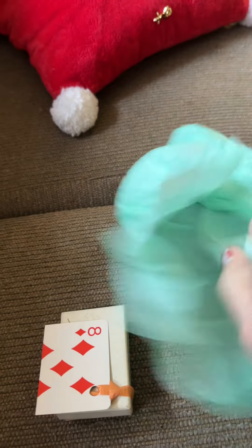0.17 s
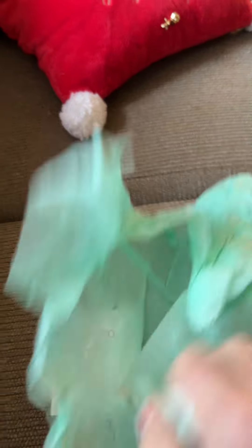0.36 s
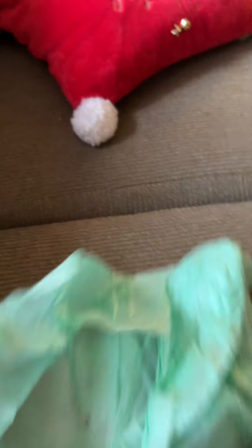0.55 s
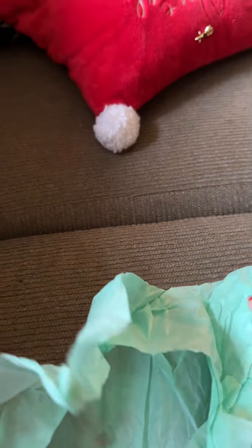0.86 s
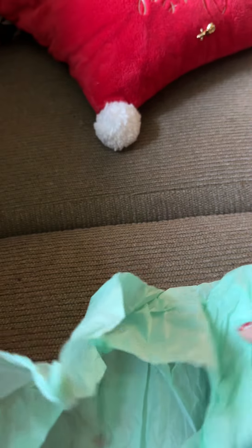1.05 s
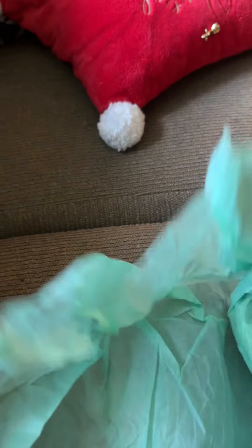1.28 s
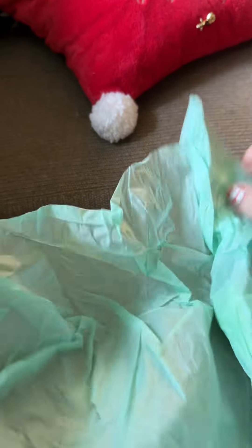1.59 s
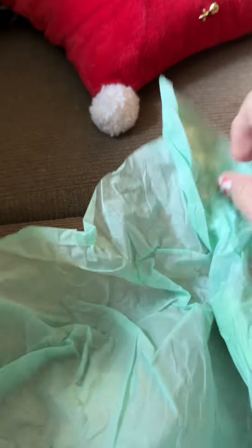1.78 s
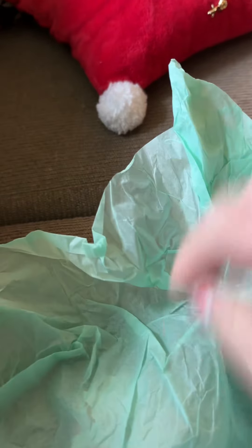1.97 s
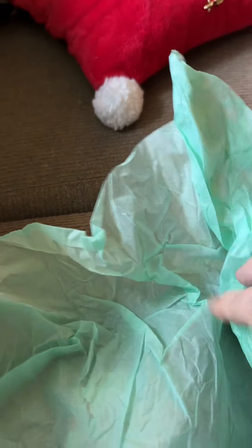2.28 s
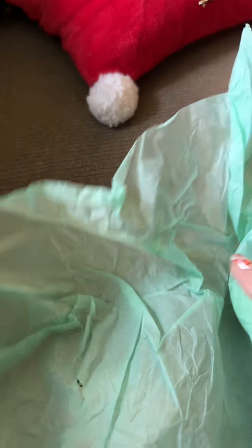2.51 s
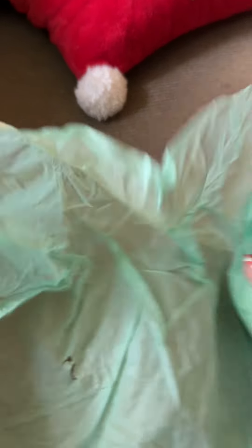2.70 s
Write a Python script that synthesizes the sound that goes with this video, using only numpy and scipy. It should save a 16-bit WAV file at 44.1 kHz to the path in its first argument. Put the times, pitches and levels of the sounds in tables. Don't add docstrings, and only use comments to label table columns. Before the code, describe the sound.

Tissue paper crinkles loudly at once as hands pull it about on a sofa, pauses with a few faint ticks, crackles again, pauses, then rustles to the end; close phone microphone, quiet room.

```python
import sys
import numpy as np
from scipy import signal
from scipy.fft import rfft, irfft, next_fast_len
from scipy.io import wavfile
from scipy.ndimage import uniform_filter1d, map_coordinates

SR = 44100
rng = np.random.default_rng(int(sys.argv[2]) if len(sys.argv) > 2 else 0)


def put_to_file(sound):
    columns = np.atleast_2d(sound).T
    safe = np.clip(columns, -1, 1)
    whole_steps = np.round(safe * 32767)
    wavfile.write(sys.argv[1], SR, whole_steps.astype(np.int16))


def gain_from_decibels(decibels):
    exponent = np.asarray(decibels, float) / 20
    return 10 ** exponent


N = 125685

FULL_DB = -38
# frequency in Hz, gain in dB.
PAPER_COLOUR = [(150, 0), (600, -0.5), (1500, 1.5), (4000, -3), (4850, -2), (5500, 1.5), (6900, -3.5),
                (9900, 0)]


def unit(x):
    return x / np.sqrt(np.mean(x ** 2) + 1e-20)


def along(points, hz):
    f, v = np.transpose(points)
    return np.interp(np.log(hz + 1), np.log(f + 1), v)


def wobble(knots_per_s):
    return unit(map_coordinates(rng.standard_normal(2000), [np.arange(N) * knots_per_s / SR]))


def filtered(x, response):
    m = next_fast_len(N + SR // 4)
    return irfft(rfft(x, m) * response(np.fft.rfftfreq(m, 1 / SR)), m)[..., :N]


def coloured_noise(points, above_hz=-1):
    return unit(filtered(rng.standard_normal((2, N)), lambda hz: gain_from_decibels(along(points, hz)) * (hz > above_hz)))


def creases(start_s, gain, hz, life_s, focus_db, low_share=0.014):
    size = 512
    t = np.arange(size) / SR
    f = np.fft.rfftfreq(size, 1 / SR) + 1
    octaves = np.log2(f / hz[:, None])
    colour = 1 + gain_from_decibels(focus_db) * np.exp(-(octaves / 0.42) ** 2)
    colour = colour / (1 + (low_share * hz[:, None] / f) ** 4)
    burst = irfft(rfft(rng.standard_normal((len(start_s), 2, size))) * colour[:, None], size)
    u = t / np.clip(life_s, 1e-4, .003)[:, None]
    burst = burst * (u ** 2 * np.exp(-u * 2.65))[:, None]
    burst = burst / np.abs(burst).max(axis=2, keepdims=True) * gain[:, None, None]
    at = (np.round(start_s * SR).astype(int)[:, None] + np.arange(size)).ravel()
    return np.array([np.bincount(at, burst[:, k].ravel(), N + SR)[:N] for k in range(2)])


def effort():
    # time in seconds, level in dB, dullness in dB.
    pulls = [(0, -41, 4), (.13, -30, -24.5), (.31, -40.5, -1.5), (.42, -35, -1.5), (0.592, -45, 0.5),
             (.68, -54.5, 3), (.76, -65.5, -6), (0.953, -89, -12), (.963, -40, -10), (1.14, -42.5, -5.5),
             (1.67, -41.5, 1.5), (1.834, -47, 0), (1.868, -62, 12.5), (2.076, -76, -13), (2.097, -51, 1),
             (2.221, -35.5, -12), (2.659, -39, -5.5), (2.721, -46, -11.5)]
    # peak time in seconds, rise in seconds, fall in seconds, boost in dB (negative: a dip).
    crushes = [(0.031, 0.016, 0.0067, -0.5), (0.166, 0.022, 0.022, 9.5), (.22, 0.021, 0.024, 7),
               (.26, 0.021, 0.023, 4), (.37, 0.012, 0.016, -0.5), (.405, 0.021, 0.027, 2),
               (.44, 0.034, 0.0099, 3), (.48, 0.018, 0.014, 6.5), (0.559, 0.012, 0.022, 5),
               (.647, 0.0077, 0.014, 7.5), (1.053, 0.02, 0.018, 7.5), (0.973, 0.0036, 0.0068, -3.5),
               (1.11, 0.0029, 0.0054, 2), (1.298, 0.02, 0.011, 8), (1.392, 0.05, 0.013, 7.5),
               (1.43, 0.0081, 0.009, 10.5), (1.525, 0.0048, 0.0084, 8.5), (1.59, 0.056, 0.025, 4),
               (1.645, 0.038, 0.015, 8), (1.677, 0.01, 0.0041, 5.5), (1.82, 0.007, 0.015, 2),
               (2.17, 0.0071, 0.008, 7), (2.186, .008, 0.0076, -7.5), (2.197, 0.0035, 0.0061, 4.5),
               (2.236, 0.011, 0.018, 4), (2.30, 0.022, 0.019, 6.5), (2.35, 0.046, 0.004, 2),
               (2.44, 0.013, 0.012, -3.5), (2.56, 0.0053, 0.028, 3), (2.60, 0.046, 0.04, 7),
               (2.74, 0.01, 0.056, 7.5), (2.81, 0.029, 0.029, 5)]
    t = np.arange(N) / SR
    swell_db = np.zeros(N)
    for at, rise_s, fall_s, boost_db in crushes:
        swell_db += boost_db * np.exp(-((t - at) / np.where(t < at, rise_s, fall_s)) ** 2)
    s, level_db, dull_db = np.transpose(pulls)
    return np.interp(t, s, level_db) + swell_db, np.interp(t, s, dull_db)


def crackles(level_db):
    per_s, centre_hz, spread_oct = 1400, 4450, 1.33
    life_s, size_db, still_db = 0.0011 / 2, 1.5, -53
    count = int(per_s * N / SR)
    draw = rng.standard_normal((count, 2))
    s = rng.uniform(0, N / SR, count)
    hand_db = level_db[(s * SR).astype(int)]
    share = np.minimum(1, gain_from_decibels(0.6 * (hand_db - FULL_DB)))
    buckles = (rng.uniform(0, 1, count) < share) & (hand_db > still_db)
    gain = gain_from_decibels(size_db * np.minimum(rng.exponential(1, count), 4)) * buckles / share ** 0.25
    hz = centre_hz * 2 ** (spread_oct * draw[:, 0])
    return unit(creases(s, gain, hz, life_s * gain_from_decibels(3 * draw[:, 1]), focus_db=9))


def rubbing():
    return rng.standard_normal((2, N)) * gain_from_decibels(1.2 * wobble(150))


def paper_bed(level_db, dull_db):
    # frequency in Hz, share of the dullness.
    dull_share = [(200, 1), (1200, 0.77), (4000, 0.5)]
    crackle_db = -5 + 1.5 * wobble(70)
    rub_db = -2.5 + 0.12 * np.minimum(level_db - FULL_DB, 0)
    bed = gain_from_decibels(crackle_db) * crackles(level_db) + gain_from_decibels(rub_db) * rubbing()
    bed = gain_from_decibels(level_db) * unit(filtered(bed, lambda hz: gain_from_decibels(along(PAPER_COLOUR, hz))))
    low = filtered(bed, lambda hz: along(dull_share, hz))
    return gain_from_decibels(3.5) * (bed + (gain_from_decibels(dull_db) - 1) * low)


def sofa(x):
    gain_db, t60_s = -19, .03
    t = np.arange(SR // 8) / SR
    tail = rng.standard_normal((2, len(t))) * gain_from_decibels(-60 * t / t60_s) * (t > .002)
    return gain_from_decibels(gain_db) * signal.fftconvolve(x, tail / np.linalg.norm(tail[0]), axes=1)[:, :N]


def air_puffs(level_db):
    # frequency in Hz, gain in dB.
    puff_colour = [(20, -42), (45, -11), (70, -1), (130, -6), (300, -8.5), (500, -11), (900, -40)]
    slow_db = uniform_filter1d(level_db, 1500)
    gain_db = -55 + 0.65 * (slow_db - FULL_DB) + 1.2 * wobble(11)
    return gain_from_decibels(gain_db) * coloured_noise(puff_colour)


def room_rumble():
    # frequency in Hz, gain in dB.
    rumble_colour = [(20, -57), (40, -10.5), (70, 1), (120, -12), (270, -15), (400, -47), (600, -87.5)]
    return gain_from_decibels(-59.5 + 1.5 * wobble(6.6)) * coloured_noise(rumble_colour)


def hiss():
    # frequency in Hz, gain in dB.
    hiss_colour = [(400, -17), (1000, -20), (1800, -4), (4100, -6), (4800, 6), (5400, -4), (10000, -6),
                   (12000, -12)]
    return gain_from_decibels(-68.5) * coloured_noise(hiss_colour, above_hz=300)


def loud_snaps():
    # start in seconds, peak in dB, colour in Hz.
    snap_rows = [(0.016, -27, 1900), (0.0253, -20.5, 1170), (0.0952, -24.5, 3100), (0.1638, -22.5, 3480),
                 (0.208, -22, 8100), (0.214, -28, 5800), (0.2212, -27.5, 4300), (0.247, -24.5, 6400),
                 (0.2669, -28, 2200), (0.2776, -26, 5600), (0.3363, -26, 1300), (0.3595, -23, 5700),
                 (0.3922, -20, 5700), (0.452, -25, 7400), (0.4725, -22, 5700), (0.4828, -18, 2400),
                 (0.5845, -24, 6500), (0.6447, -24.5, 7700), (0.6858, -36.5, 8400), (0.9637, -45, 1900),
                 (0.9698, -28, 8600), (1.0319, -22, 5800), (1.1061, -29, 6200), (1.1382, -27, 1530),
                 (1.177, -34, 6200), (1.1835, -24.5, 3000), (1.192, -27.5, 7540), (1.2066, -24, 6140),
                 (1.2194, -22, 7600), (1.2326, -25, 5540), (1.2468, -21.5, 9500), (1.2573, -24, 8900),
                 (1.2686, -23, 6100), (1.3007, -27, 2500), (1.3341, -23.5, 2300), (1.3889, -18, 7700),
                 (1.4116, -26, 6300), (1.4205, -26, 5500), (1.4294, -29, 5200), (1.4388, -23, 2600),
                 (1.45, -18, 3050), (1.457, -34, 1500), (1.4682, -23.5, 5770), (1.4968, -24, 1300),
                 (1.5138, -29, 1990), (1.5232, -27, 1900), (1.528, -31, 4260), (1.5492, -23, 2750),
                   (1.581, -21, 2900), (1.602, -22.5, 1300), (1.6277, -19, 6500), (1.6342, -20, 1600),
                   (1.6454, -23, 1900), (1.6748, -21, 2050), (1.6808, -26, 1400), (1.719, -30.5, 5600),
                   (1.7357, -27, 5800), (1.7697, -29, 7700), (1.7755, -31, 2700), (1.7985, -31, 6000),
                   (1.806, -33, 6000), (1.8242, -25.5, 4800), (2.1667, -26, 5800), (2.2159, -26, 1820),
                   (2.233, -35, 5700), (2.2367, -25, 1960), (2.245, -24.5, 5600), (2.2533, -20, 1720),
                   (2.2831, -25, 5900), (2.3422, -23.5, 5600), (2.349, -24, 5600), (2.355, -16.5, 9900),
                   (2.371, -32, 2700), (2.3762, -33, 2700), (2.3998, -26.5, 7140), (2.4216, -40, 7100),
                   (2.4377, -20, 5900), (2.4618, -29.5, 4270), (2.4773, -30, 1700), (2.4883, -27, 4000),
                   (2.509, -28.5, 2100), (2.5518, -16, 8400), (2.5713, -25, 5700), (2.621, -22.5, 2010),
                   (2.6338, -19, 1080), (2.6515, -22.5, 5600), (2.6589, -22, 2560), (2.6674, -35, 5600),
                   (2.6728, -28, 2600), (2.6873, -30, 5570), (2.7022, -31, 2000), (2.7082, -30, 1600),
                   (2.7223, -33, 7200), (2.7362, -22.5, 3540), (2.7506, -39, 6200), (2.7573, -29, 2860),
                   (2.7746, -29.5, 2080), (2.8073, -19.5, 6130), (2.8166, -26, 6500), (2.8445, -29, 2520)]
    at, peak_db, hz = np.transpose(snap_rows)
    life_s = np.full(len(at), .001)
    snaps = creases(at, gain_from_decibels(peak_db + 2.5), hz, life_s, focus_db=9, low_share=0.17)
    return filtered(snaps, lambda f: gain_from_decibels(along(PAPER_COLOUR, f)))


def settling_ticks():
    # start in seconds, peak in dB, colour in Hz, length in seconds.
    tick_rows = [(.7545, -47, 2800, .0025), (.7548, -43, 6500, .0025), (.8365, -50, 6400, .002),
                 (.8410, -45, 9800, .001), (.8426, -28, 7800, .0014), (.9007, -39, 2500, .0022),
                 (.9009, -40, 7000, .0022), (.9380, -53, 2000, .003), (1.8405, -40, 7000, .002),
                 (1.8515, -39, 5500, .0016), (1.8610, -39, 2000, .002), (1.8765, -37, 5000, .0016),
                 (1.9303, -39, 4300, .0022), (1.9465, -50, 4500, .0016), (1.9980, -36, 2700, .0018),
                 (1.9981, -38, 7500, .0016), (2.0785, -49, 3000, .003)]
    at, peak_db, hz, length_s = np.transpose(tick_rows)
    return creases(at, gain_from_decibels(peak_db + 4), hz, length_s / 2, focus_db=7, low_share=.45)


def scene():
    # frequency in Hz, likeness of the two ports (0 to 1).
    likeness = [(100, .995), (700, .78), (1900, .96), (3300, .62), (4600, .35), (6300, .97), (8500, .78),
                (11500, .9)]
    level_db, dull_db = effort()
    sheet = paper_bed(level_db, dull_db) + loud_snaps() + settling_ticks()
    field = sheet + sofa(sheet) + air_puffs(level_db) + room_rumble() + hiss()

    def shared_and_unrelated(hz):
        angle = np.arccos(np.clip(along(likeness, hz), 0, 1)) / 2
        return np.array([np.cos(angle), np.sin(angle)])

    mid, side = filtered(field, shared_and_unrelated)
    return np.array([mid + side, mid - side])


def ports(x):
    # frequency in Hz, gain in dB.
    port_top = [(9900, 0), (11000, -6.5), (12100, -8), (13300, -4.5), (15200, -2.5)]
    # frequency in Hz, left minus right in dB.
    balance = [(60, 0), (350, -2), (850, -9), (1800, 0), (3200, -3), (4700, 3), (5800, 0)]
    # frequency in Hz, lead of the right port in radians.
    lead = [(4350, 0), (4750, 3.1), (5600, 6.1), (7100, 6.45), (8100, 7.25), (11500, 9.25), (14000, 9.6),
            (15900, 10.8)]
    half = np.array([[-.5], [.5]])

    def response(hz):
        gain_db = along(port_top, hz) - half * along(balance, hz)
        return gain_from_decibels(gain_db) * np.exp(1j * half * along(lead, hz)) * (hz < 15850)

    return filtered(x, response)


def masked(x):
    # start in seconds, length in seconds.
    busy = [(.015, .025), (.32, .035), (.47, .05), (.645, .05), (.836, .018), (.895, .016), (1.09, .035),
            (1.2, .075), (1.485, .045), (1.665, .04), (1.76, .125), (1.992, .018), (2.15, .035),
            (2.335, .04), (2.42, .025), (2.525, .04), (2.65, .21)]
    mask_db, wander_db, mask_above_hz = 7, 2.5, 1600
    hz, t, z = signal.stft(np.array([x[0] + x[1], x[0] - x[1]]) / 2, SR, nperseg=512)
    band = (np.log(hz + 3000) * 22).astype(int)
    power = (band[:, None] == band) @ uniform_filter1d(np.abs(z) ** 2, 7, 2)
    calm = ~np.any([(t > s + length / 4) & (t < s + length - .006) for s, length in busy], axis=0)
    frame_at = np.minimum(t * SR, N - 1).astype(int)
    margin_db = mask_db + wander_db * wobble(12)[frame_at]
    weaker = power * gain_from_decibels(2 * margin_db) < power[::-1]
    drop = weaker & calm & (hz[:, None] > mask_above_hz)
    mid, side = signal.istft(z * ~drop, SR, nperseg=512)[1][:, :N]
    return np.array([mid + side, mid - side])


def low_pass(x):
    return signal.sosfilt(signal.butter(12, 16990, fs=SR, output="sos"), x)


def record(dry):
    mix = masked(ports(dry))
    return low_pass(mix)


dry = scene()
out = record(dry)
put_to_file(out)
```